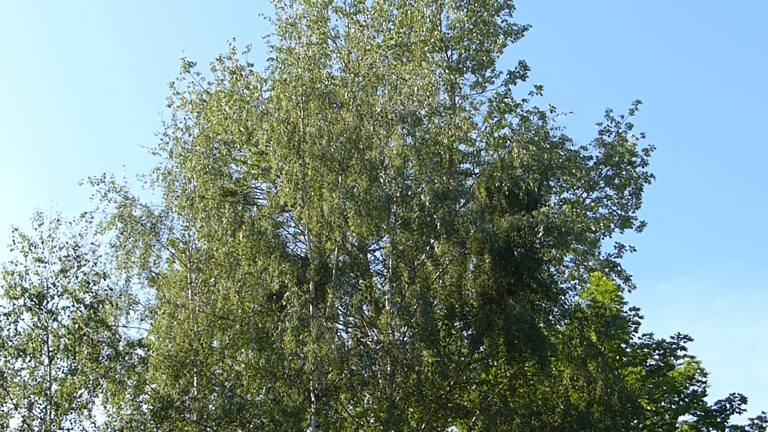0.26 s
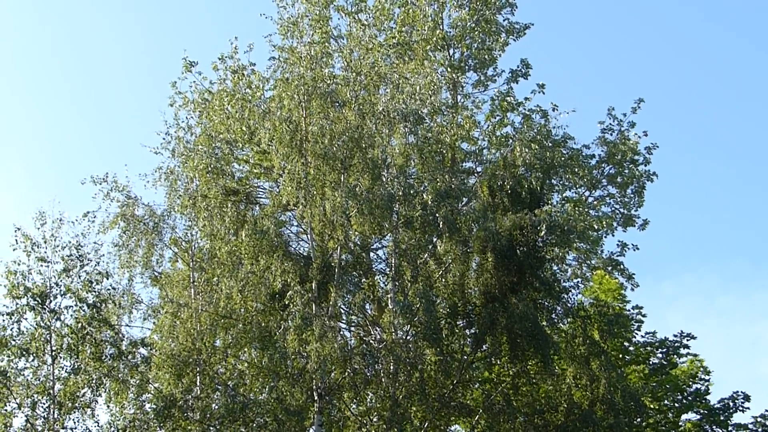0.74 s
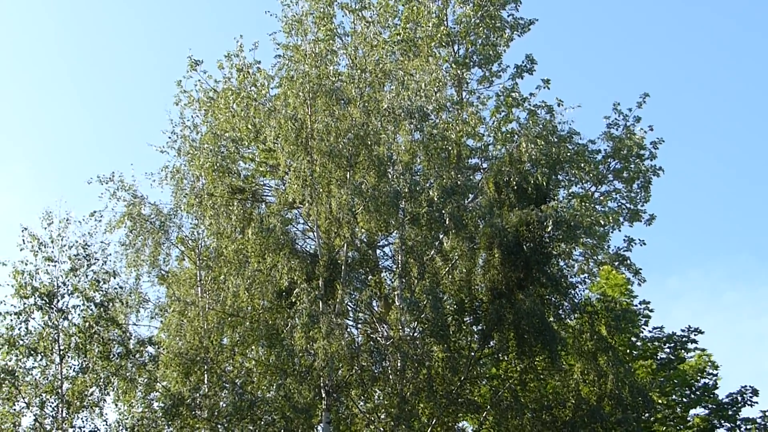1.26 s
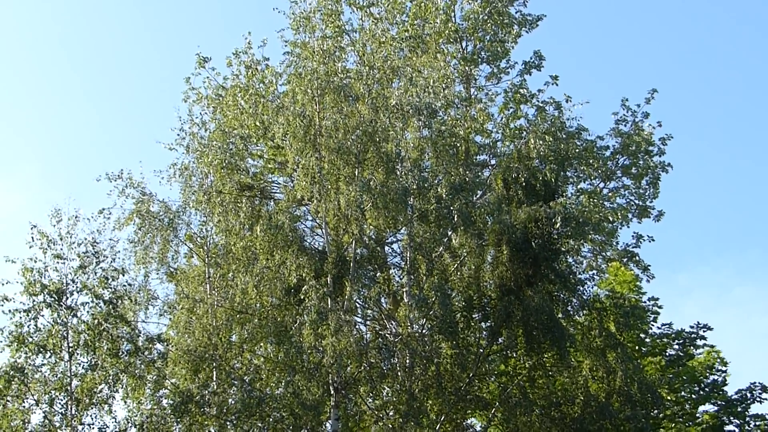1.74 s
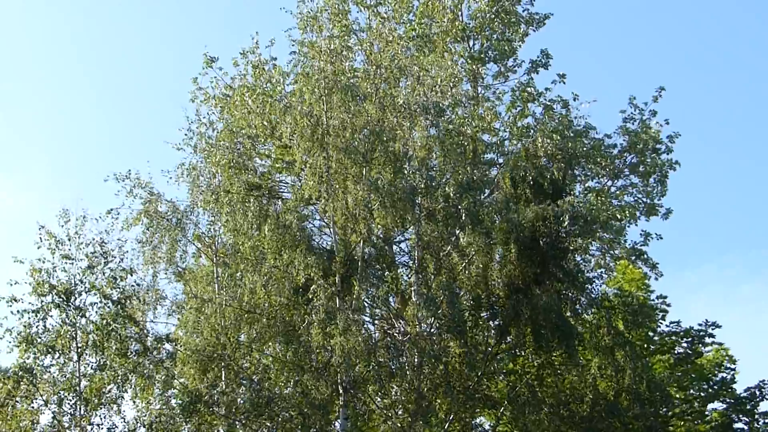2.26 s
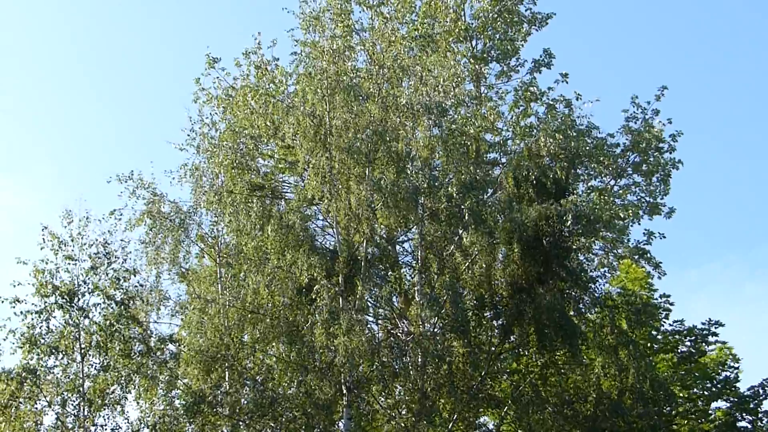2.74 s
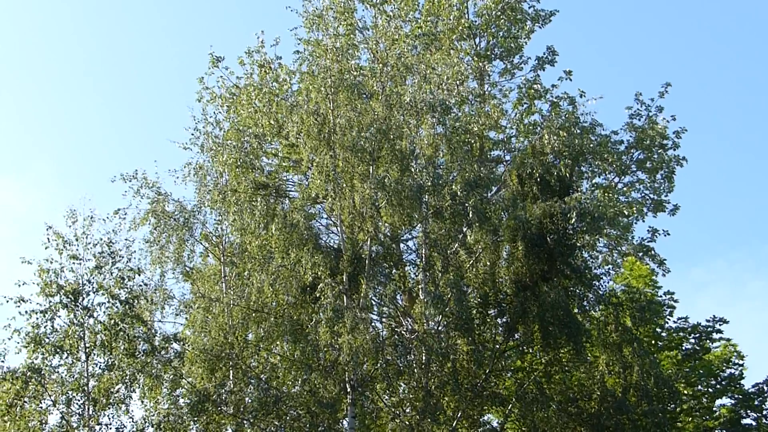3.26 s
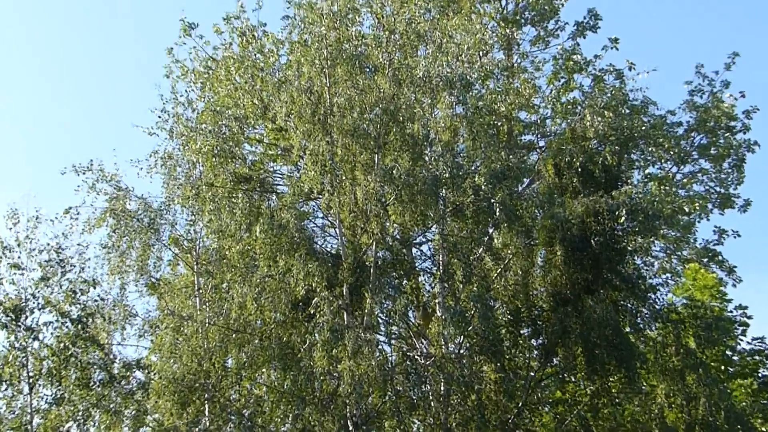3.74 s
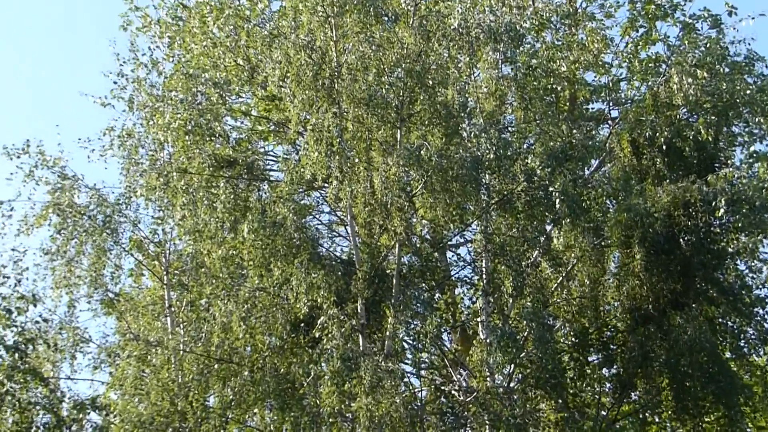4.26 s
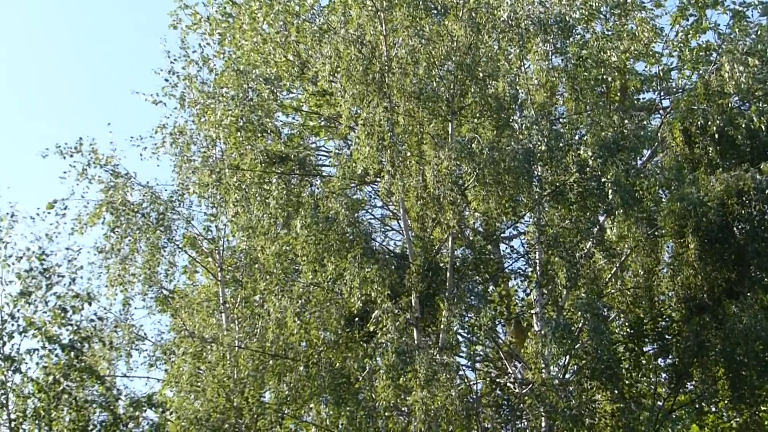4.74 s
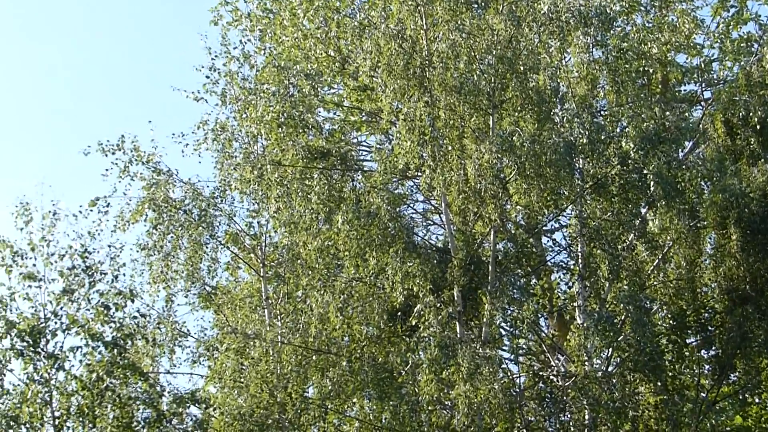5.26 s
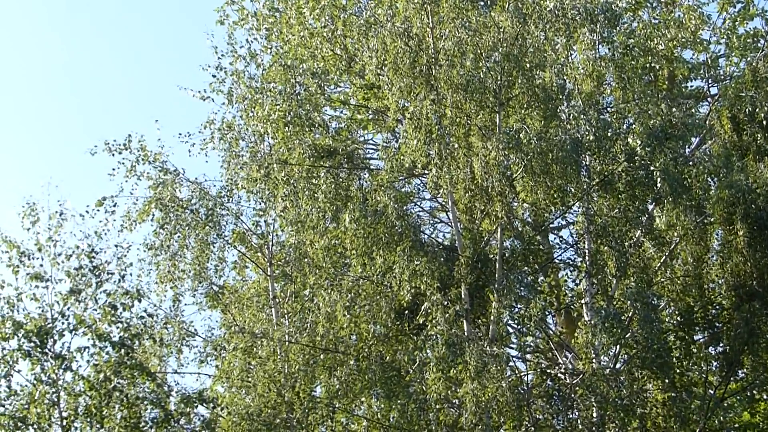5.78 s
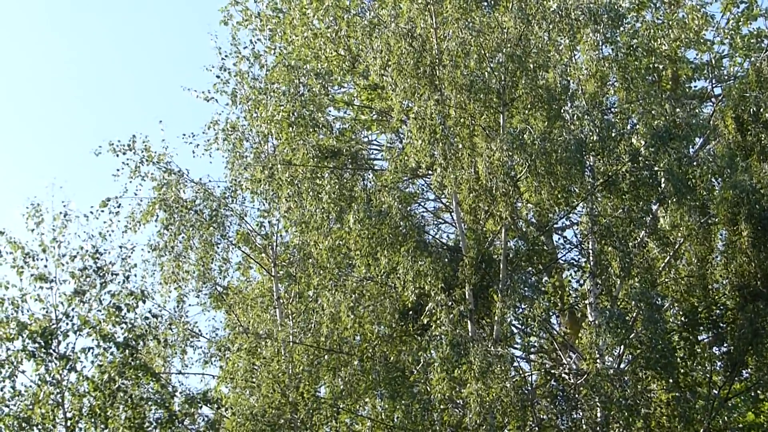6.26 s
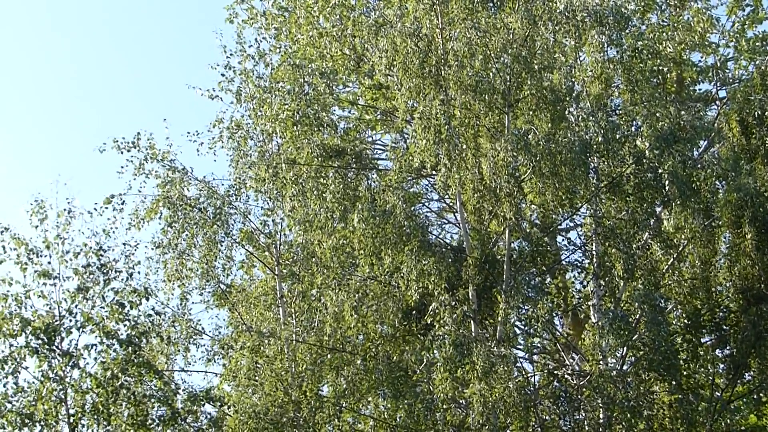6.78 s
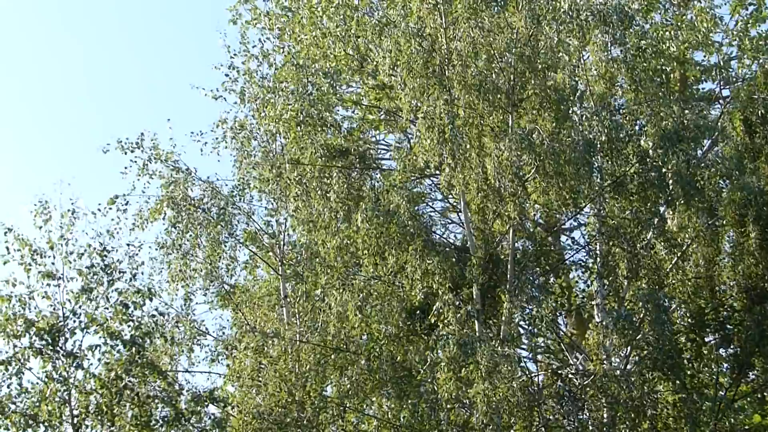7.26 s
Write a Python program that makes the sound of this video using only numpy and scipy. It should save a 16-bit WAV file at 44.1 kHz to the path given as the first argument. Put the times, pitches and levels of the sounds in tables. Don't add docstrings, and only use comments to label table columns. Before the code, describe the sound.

From 0 to 3.3 seconds a small warbler, centred and clearly loudest, sings a rapid, high, sweet phrase. Quick flourishes lead into sharp falling whistles until about 1 second; three hooked drops follow, then a longer, lower fall near 1.35. Between 1.7 and 2.9 come twisting notes and evenly repeated downward slides with little flicks, and a tight four-beat rattle closes the song around 3.0 to 3.3. Weaker birds left and right chip and whistle in between. After that only they remain: soft falling drips from 3.8 to 4.9, scattered chirps and short high blips around 5 to 5.3, tiny whistles and a brief buzz near 6.25, dry chirrs at 6.7 and 7.35. Faint leaf ticks occur near 5.2, 5.5 and 6.4. Soft breeze and distant hum continue to 7.5, and trees give the calls a diffuse outdoor echo.

```python
import sys
import numpy as np
from scipy import signal
from scipy.fft import rfft, irfft
from scipy.io import wavfile
from scipy.ndimage import uniform_filter1d

SR = 44100
rng = np.random.default_rng(int(sys.argv[2]) if len(sys.argv) > 2 else 0)


def generate_wav(signal):
    frames = np.transpose(np.atleast_2d(signal))
    scaled = np.clip(frames, -1, 1) * 32767
    pcm = np.round(scaled).astype(np.int16)
    wavfile.write(sys.argv[1], SR, pcm)


def natural_amplitude(level_db):
    exponent = np.asarray(level_db, float) / 20
    return 10 ** exponent


N = 331191

# frequency in Hz, density in dB per Hz.
AIR_COLOUR = [(18, -14), (30, -15.5), (164, -8.5), (307, -7.5), (369, -4.5), (467, -0.5), (561, -4),
              (897, 0.5), (1050, -3), (2180, -11.5), (4090, -7.5), (9680, -16), (15500, -29)]
# frequency in Hz, likeness from -1 to 1.
AIR_ALIKE = [(30, 0.65), (60, 0.62), (250, -0.21), (700, -0.17), (1500, 0.28), (4000, 0.64), (15000, 0.35)]
# centre in Hz, width in Hz, gain in dB.
HOLLOWS = [
    (232, 43, 8),
    (307, 28.4, 11),
    (474, 54, 6),
    (1050, 44, -6),
]
# time in seconds, level in dB.
BREEZE = [(0, 1.5), (1.5, 1), (1.9, 3), (2.7, 1), (3.3, 2.5), (3.45, -2.5), (3.75, -0.5), (3.95, 2.5),
          (4.3, -0.5), (5.7, 1), (7.5, 0)]
# start in seconds, level in dB.
TICKS = [
    (5.19, -51),
    (5.494, -51.5),
    (6.44, -56),
]

# start in seconds, length in seconds, top pitch in Hz, level in dB.
WIDE_TRILLS = [(0., .1, 5000, -52), (.18, .2, 3900, -55), (2.3, .4, 3900, -56), (3.0, .24, 5200, -54),
               (3.67, .2, 5600, -57), (3.83, .083, 6500, -54.5), (4.461, .16, 5900, -57),
               (4.696, .11, 5300, -53), (4.749, .11, 1850, -58.5), (4.959, .021, 5150, -51),
               (6.014, .12, 5900, -50.5), (6.335, .022, 5100, -46), (6.431, .034, 7400, -57),
               (6.478, .022, 5200, -48), (6.999, .057, 2800, -54)]
# start in seconds, length in seconds, top pitch in Hz, level in dB.
NARROW_TRILLS = [
    (0., 0.035, 6540, -47.5),
    (0., 0.039, 4210, -50),
    (1.36, 0.2, 2843, -51),
    (1.999, .7, 3500, -60),
    (3.566, .22, 7050, -65),
    (6.118, .041, 7470, -58.5),
]
# start in seconds, length in seconds, first and last pitch in Hz, level in dB.
FAINT_GLIDES = [(.673, .012, 3700, 4120, -50.5), (1.082, .01, 5250, 5070, -53),
                (1.085, 0.016, 3800, 3120, -55), (1.099, .04, 3050, 2960, -66),
                (1.42, .03, 3900, 3400, -52), (1.825, 0.017, 4900, 4160, -43.5),
                (1.853, 0.0055, 4700, 4870, -45), (2.155, 0.0073, 3400, 3740, -50),
                (2.268, .012, 2300, 2040, -61), (2.612, 0.014, 3100, 3110, -58),
                (2.62, 0.039, 2250, 2220, -58), (2.86, 0.081, 2680, 2670, -65.5),
                (2.97, 0.027, 2450, 1950, -58), (3.015, 0.2, 2640, 2696, -66.5),
                (3.38, 0.02, 4500, 3700, -53), (3.41, 0.052, 3950, 4050, -59.5),
                (3.475, 0.05, 3100, 3450, -62), (3.6, 0.018, 4500, 4300, -63),
                (3.843, 0.011, 4800, 5060, -58), (4.203, .01, 3700, 4300, -62),
                (4.222, 0.0088, 4000, 3500, -70), (3.768, .014, 5700, 4860, -58),
                (3.843, 0.02, 5800, 6800, -60), (3.878, 0.015, 5700, 6560, -60.5),
                (3.953, .014, 4250, 3700, -54.5), (3.86, 0.23, 1264, 1227, -70),
                (4.145, 0.022, 817, 794, -60), (4.155, 0.041, 2850, 2480, -66),
                (4.2, 0.038, 2420, 2370, -71), (4.465, 0.034, 4300, 3600, -69),
                (4.462, 0.01, 6300, 5580, -59), (4.588, 0.026, 4100, 3700, -65),
                (4.705, 0.081, 4950, 4870, -62.5), (4.72, 0.089, 3350, 3360, -67),
                (4.785, 0.071, 2250, 1700, -62), (5.83, .095, 4450, 3900, -70),
                (6.03, 0.11, 6050, 6900, -67), (1.52, 0.066, 8100, 7650, -67),
                (6.11, 0.091, 5050, 5250, -79), (6.783, .012, 5900, 5700, -67),
                (6.995, .012, 1800, 1740, -51.5), (7.245, 0.022, 2750, 2980, -59)]

SWEEP = [
    (.004, .052, 4310, 3144, 2510, -55),
]
SWEEP_AT = 3.031 + .1203 * np.arange(6)
HUMP = [
    (0., 0.0246, 1470, 1790, 1665, -50),
]
HUMP_AT = [.839, .892, 2.31, 2.35, 2.393, 2.429]
DRIP = [
    (.003, .012, 3460, 2980, 2440, -59),
    (.015, 0.0156, 2440, 2105, 1850, -69.5),
]
DRIP_AT = [3.805, 3.961, 4.107, 4.25, 4.407, 4.55, 4.689, 4.83]
# start in seconds, length in seconds, first and last pitch in Hz, level in dB.
EDGE_GLIDES = [
    (.33, 0.013, 4420, 4300, -53),
    (.342, 0.014, 4300, 2900, -46),
    (.361, 0.016, 2500, 1950, -53.5),
    (2.139, .055, 2500, 1410, -52),
]

# start in seconds, length in seconds, pitch in Hz, level in dB.
RIGHT_HELD = [
    (1.852, 0.08, 2380, -53.5),
    (2.352, 0.03, 2360, -56),
    (2.384, 0.063, 2350, -52.5),
    (6.96, .09, 7750, -73),
    (7.09, 0.065, 7800, -67),
    (6.884, 0.041, 6400, -65),
    (7.315, 0.019, 8200, -60),
    (6.8, 0.14, 4050, -64.5),
]
# start in seconds, length in seconds, first and last pitch in Hz, level in dB.
RIGHT_GLIDES = [(.484, 0.032, 4320, 3650, -53), (2.022, 0.033, 2440, 2193, -56),
                (2.538, 0.017, 2630, 2150, -55), (3.331, 0.033, 4260, 3650, -46.5),
                (3.643, .031, 4640, 3770, -50.5), (3.907, .033, 4550, 3630, -49),
                (6.17, 0.18, 5300, 6150, -66), (6.215, 0.02, 4400, 3960, -56),
                (6.232, 0.14, 3870, 4115, -53.5), (4.357, .016, 5900, 5200, -62),
                (4.6, 0.016, 6560, 6050, -58), (5.955, 0.062, 4000, 4580, -68),
                (6.156, 0.032, 3290, 2030, -57), (7.27, 0.075, 7300, 6900, -68),
                (6.348, 0.023, 5620, 4480, -56), (6.99, 0.115, 5320, 5900, -63.5),
                (7.01, 0.15, 3610, 4080, -61)]
DOUBLE = [
    (0., 0.013, 3490, 3430, 3340, -53),
    (.021, 0.011, 3550, 3540, 3470, -58),
]
DOUBLE_AT = 2.743 + .0655 * np.arange(4)

# start in seconds, length in seconds, pitch in Hz, level in dB.
LEFT_HELD = [(0., 0.018, 4000, -48), (.223, 0.03, 2836, -53.5), (.253, .028, 2810, -47.5),
             (.512, 0.03, 2567, -55), (6.5, .04, 3250, -58), (.197, .024, 3366, -49.5),
             (5.154, 0.029, 4100, -47), (5.278, .015, 4720, -50.5), (6.592, 0.046, 2840, -54.5),
             (6.649, 0.047, 2830, -55), (6.714, 0.069, 2830, -60), (6.886, 0.16, 2540, -61.5),
             (0., 0.024, 6360, -53)]
# start in seconds, length in seconds, first and last Hz, level in dB.
LEFT_EARLY = [(.156, .014, 2690, 3650, -54), (.412, 0.028, 1917, 2525, -50.5),
              (1.311, 0.0373, 3670, 3000, -49), (1.562, 0.062, 3130, 3640, -46.5),
              (1.115, 0.023, 3420, 3640, -47), (2.653, 0.0394, 2380, 2630, -51.5),
              (5.8, .012, 4510, 4440, -62), (4.877, 0.022, 2090, 2200, -59.5),
              (5.096, 0.063, 2900, 4054, -48.5), (5.258, 0.02, 6500, 5160, -51),
              (5.285, 0.0243, 3450, 4200, -52.5), (6.6, 0.021, 6500, 4400, -74),
              (5.525, 0.027, 2050, 2950, -57.5), (5.623, .044, 3337, 2780, -57),
              (5.667, 0.0298, 2900, 2380, -55), (5.736, 0.017, 2230, 2130, -54),
              (5.815, 0.027, 2040, 1820, -56), (6.7, .01, 1800, 1620, -73),
              (6.488, 0.013, 4200, 3560, -49.5), (6.864, 0.0221, 1750, 2490, -56),
              (7.175, 0.0265, 5640, 4770, -58)]
# start in seconds, length in seconds, first and last Hz, level in dB.
LEFT_LATE = [(.446, .06, 2620, 2240, -54), (2.777, 0.053, 2600, 2236, -52), (5.952, 0.032, 1620, 1320, -60),
             (4.33, 0.029, 3910, 3370, -53), (4.375, 0.021, 3770, 3090, -54.5),
             (1.86, 0.05, 3950, 3280, -44), (3.687, 0.028, 5180, 4570, -54.5),
             (3.884, 0.028, 3950, 3310, -53.5), (4.797, 0.035, 1400, 1580, -54),
             (4.97, 0.026, 4130, 3800, -56), (7.491, .017, 2850, 3280, -60)]
# start in seconds, length in seconds, edge pitch and turning pitch in Hz, level in dB.
LEFT_TURNS = [(6.074, 0.034, 1495, 1652, -55), (1.219, 0.05, 2310, 2690, -57),
              (1.98, 0.033, 2650, 2194, -55.5), (4.539, 0.055, 2460, 1940, -62),
              (5.708, 0.017, 2570, 2285, -54), (5.773, 0.032, 2130, 1918, -53),
              (6.541, 0.039, 3320, 3490, -50.5), (7.11, 0.0233, 3840, 4150, -50.5),
              (7.126, 0.013, 3950, 3535, -47), (7.142, 0.017, 3710, 4420, -48.5),
              (7.267, .023, 2630, 3306, -55)]
# start in seconds, length in seconds, first and last pitch in Hz, level in dB.
CHIPS = [(.072, 0.009, 2030, 2600, -58), (.084, 0.0086, 2480, 1870, -53.5), (2.832, 0.018, 2236, 1800, -58),
         (5.049, 0.029, 5250, 3360, -52), (5.249, 0.0083, 4500, 6530, -56),
         (5.502, 0.013, 2570, 1920, -59.5), (5.782, 0.016, 5900, 4580, -64),
         (5.927, 0.009, 4000, 2400, -66), (6.055, .009, 2980, 1700, -65), (6.338, .012, 4680, 4550, -56),
         (6.478, 0.013, 4470, 4880, -52), (6.848, 0.0086, 1970, 2400, -69)]
# start in seconds, length in seconds, first and last pitch in Hz, level in dB.
BUZZES = [
    (0.694, 0.061, 2220, 1730, -52),
    (5.304, 0.021, 4320, 4290, -53.5),
    (6.25, 0.0513, 2092, 2405, -53.5),
]
PIP = [
    (0., 0.0152, 2690, 2422, 2258, -51),
]
PIP_AT = .594 + 0.032 * np.arange(4)
SCOOP = [
    (0., 0.0256, 1880, 2590, 2640, -62.5),
]
SCOOP_AT = [5.376, 5.426]
CHIRR = [
    (0., .016, 4900, 4740, 4290, -51.5),
    (.018, 0.0096, 4480, 3830, 4400, -47),
    (.034, .008, 4810, 4690, 4400, -55),
    (.044, 0.013, 4300, 3900, 4030, -48),
]
CHIRR_AT = [6.712, 7.344]

OPENING = [
    (-.092, 0.0075, 5000, 5440, 6200, -48.5),
    (-.078, .012, 8400, 9300, 9700, -60),
    (-.077, .014, 4500, 4800, 5200, -47.5),
    (-.063, 0.0057, 5200, 6000, 7000, -47),
    (-.051, .016, 8600, 7600, 7500, -53),
    (-.027, .008, 7700, 6900, 6450, -44.5),
    (-.019, .018, 6450, 6750, 6400, -48.5),
]
OPENING_AT = [.258, .489, .805]
LEAD_IN = [
    (-.03, 0.0175, 7920, 7360, 7200, -53),
    (-.011, 0.015, 8480, 7600, 6540, -48),
]
LEAD_IN_AT = [1.354]
HOOK = [
    (-.034, 0.016, 6290, 5740, 5830, -46.5),
    (-.012, .006, 8800, 9270, 9000, -58),
    (-.006, 0.0043, 9000, 7400, 6840, -47),
    (-.001, .009, 6350, 5520, 5100, -35.5),
    (.008, .034, 5326, 4440, 3850, -38),
]
HOOK_AT = 1.018 + .113 * np.arange(3)
TWIST = [
    (-.033, 0.0065, 7230, 5640, 4950, -47),
    (-.025, .007, 4940, 6620, 8300, -47),
    (-.018, 0.005, 8300, 8750, 8000, -51),
    (-.012, 0.0065, 6410, 5430, 4650, -38),
    (-.006, .01, 4670, 5150, 5330, -34),
    (.004, 0.0168, 5340, 4670, 4070, -39),
    (.021, 0.0142, 4100, 4420, 5000, -40),
]
TWIST_AT = [1.702, 1.961]
VEE = [
    (-.044, .008, 7670, 6410, 5030, -48),
    (-.036, 0.022, 5080, 6000, 6840, -41.5),
    (-.014, .01, 3950, 4500, 4900, -50),
]
UPSTROKE = [
    (-.029, 0.0102, 5700, 6150, 6750, -41.5),
]
SLIDE = [
    (-.004, .009, 4905, 5220, 5200, -43),
    (.005, .017, 5480, 5000, 4510, -38),
    (.022, .027, 4476, 4134, 3690, -41),
]
SLIDE_AT = [1.769, 2.028, 2.229, 2.422, 2.613, 2.808]
SLIDE_TAIL = [
    (.057, .006, 4400, 4750, 4830, -46),
    (.063, 0.013, 4850, 4520, 3900, -42),
    (.081, .006, 4350, 4700, 4850, -39.5),
    (.087, 0.0089, 4885, 4935, 4980, -39.5),
]
RATTLE = [
    (-.009, 0.01, 7170, 6200, 5500, -44),
    (.001, .007, 5480, 5470, 5740, -40.5),
    (.008, 0.012, 5700, 6300, 6900, -41),
]
RATTLE_AT = 3.019 + .071 * np.arange(4)
RATTLE_GRACE = [
    (-.014, .006, 8500, 7900, 7200, -48),
]
# start in seconds, length in seconds, last pitch in Hz, level in dB.
FALLS = [
    (0.26, 0.059, 4660, -35),
    (0.488, 0.059, 4710, -33.5),
    (0.611, 0.055, 4685, -33.5),
    (0.807, 0.054, 4625, -34),
    (.903, .039, 4600, -35),
    (1.358, 0.088, 3765, -34.5),
]
# start in seconds, length in seconds, first and last pitch in Hz, level in dB.
SONG_GLIDES = [(1.556, 0.015, 5010, 4100, -39.5), (1.592, 0.0067, 6900, 5430, -43),
               (1.6, 0.012, 5330, 6050, -36), (2.329, .024, 3260, 4380, -45),
               (2.972, 0.0065, 8520, 6450, -43.5), (2.979, 0.011, 6200, 6220, -46),
               (3., 0.0089, 6240, 6100, -47), (1.57, 0.0063, 4150, 4150, -39),
               (1.762, 0.0051, 6740, 5330, -44), (2.022, 0.0082, 6190, 5020, -43),
               (2.277, 0.0089, 3690, 3300, -56), (3.268, .005, 4190, 4940, -39),
               (3.273, 0.021, 5110, 4360, -39), (3.293, 0.02, 4250, 3690, -40.5)]
# start in seconds, length in seconds, edge pitch and turning pitch in Hz, level in dB.
SONG_TURNS = [
    (.598, .015, 6400, 6950, -46),
    (1.525, 0.013, 5180, 6580, -47),
    (1.54, 0.016, 4970, 5340, -39),
    (2.956, .0097, 7500, 8250, -52),
]

EARLY_REACH, EVEN_REACH, LATE_REACH = .75, .55, .26
OPEN_TWIGS_DB, LEAFY_TWIGS_DB = -12, -5


def walk(rate):
    hold = int(SR / rate)
    steps = np.repeat(rng.standard_normal(N // hold + 1), hold)
    return 1.4 * uniform_filter1d(steps, hold)[:N]


def air(level_db=-52.5, flicker_db=1.18):
    hz = np.fft.rfftfreq(N, 1 / SR) + 1
    colour_hz, colour_db = np.transpose(AIR_COLOUR)
    db = np.interp(np.log(hz), np.log(colour_hz), colour_db)
    for centre_hz, width_hz, gain_db in HOLLOWS:
        db = db + gain_db / (1 + ((hz - centre_hz) / width_hz * 2) ** 2)
    alike_hz, likeness = np.transpose(AIR_ALIKE)
    alike = np.clip(np.interp(np.log(hz), np.log(alike_hz), likeness), -.9, .9)
    mid, side = rfft(rng.standard_normal((2, N))) * natural_amplitude(db) * np.sqrt([1 + alike, 1 - alike])
    ports = np.array([mid + side, mid - side])
    swell_db = np.interp(np.arange(N) / SR, *np.transpose(BREEZE))
    out = 0
    for octave in range(5, 15):
        band = np.cos(np.pi / 2 * np.clip(np.log2(hz) - octave, -1, 1)) ** 2
        gain_db = swell_db * (octave > 7) + flicker_db * walk(10)
        out = out + irfft(ports * band, N) * natural_amplitude(gain_db)
    return out * natural_amplitude(level_db + np.array([[.4], [-.4]])) / out.std()


def ticks():
    out, t = np.zeros(N), np.arange(SR // 20) / SR
    for start, db in TICKS:
        envelope = natural_amplitude(db - 60 * t / .078) * np.clip(t / .0031, 0, 1)
        out[int(start * SR):][:len(t)] += envelope * rng.standard_normal(len(t))
    bright = signal.butter(1, (5000, 10000), "band", fs=SR, output="sos")
    return signal.sosfilt(bright, out)


def swaying(x, echoes):
    turn = 1.6 * walk(6)
    first = signal.fftconvolve(x * np.cos(turn), echoes[0])[:N]
    second = signal.fftconvolve(x * np.sin(turn), echoes[1])[:N]
    return first + second


def twigs(x, share_db, t60_s=.05):
    t = np.arange(int(t60_s * SR)) / SR
    echoes = rng.standard_normal((2, len(t))) * natural_amplitude(-60 * t / t60_s)
    return x + swaying(x, echoes * natural_amplitude(share_db) / np.sqrt(np.sum(echoes[0] ** 2)))


def wood(x, late_db, late_t60, alike, beyond_db, depth_s=.093, leaf_hz=2400, onset_s=.0069):
    trunks_per_s, trunk_share, clump_db = 350, .15, 1.5
    t = np.arange(int(1.2 * SR)) / SR
    tail = natural_amplitude(late_db - 60 * t / late_t60) * np.clip(t / onset_s, 0, 1) / np.sqrt(late_t60)
    tail = tail * natural_amplitude(beyond_db * np.clip((t - depth_s) / .0072, 0, 1))
    tail = tail * natural_amplitude(clump_db * walk(198.6)[:len(t)]) / np.sqrt(SR / 14)
    trunk = rng.random(len(t)) < trunks_per_s / SR
    tail = tail * np.sqrt(1 - trunk_share + trunk_share * trunk * SR / trunks_per_s)
    leaves = signal.butter(2, leaf_hz, "high", fs=SR, output="sos")
    mid, side = signal.sosfilt(leaves, rng.standard_normal((2, 2, len(t))) * tail)
    side = side * np.sqrt((1 - min(alike, .99)) / (1 + alike))
    mid, side = swaying(x, mid), swaying(x, side)
    return np.array([mid + side, mid - side])


def place(x, pan_db, lag_us, twigs_db=LEAFY_TWIGS_DB):
    hz = np.fft.rfftfreq(N, 1 / SR)
    x = twigs(x, twigs_db)
    late = irfft(rfft(x) * np.exp(-2j * np.pi * hz * lag_us * 1e-6), N)
    return np.array([late * natural_amplitude(pan_db / 2), x * natural_amplitude(-pan_db / 2)])


def stroke_shape(n, edge_s=.0023):
    t = np.arange(n) / SR
    return np.sin(np.pi / 2 * np.clip(np.minimum(t, t[::-1]) / edge_s, 0, 1)) ** 2


def repeat(figure, times, growth_db=0.):
    return [(start + r[0], *r[1:5], r[5] + k * growth_db)
            for k, start in enumerate(times) for r in figure]


def glides(rows, reach):
    return [(s, d, a, a + reach * (c - a), c, db) for s, d, a, c, db in rows]


def turns(rows):
    return [(s, d, edge, turn, edge, db) for s, d, edge, turn, db in rows]


def held(rows):
    return [(s, d, hz, hz, hz, db) for s, d, hz, db in rows]


def in_time(strokes):
    return sorted(strokes, key=lambda r: r[0])


def slurred(strokes):
    notes = []
    for r in strokes:
        last = notes[-1][-1] if notes else None
        if last and abs(last[0] + last[1] - r[0]) < .0035 and abs(last[4] / r[2] - 1) < .08:
            notes[-1].append(r)
        else:
            notes.append([r])
    return notes


def whistle(strokes, arch_db, flutter_db, low_db=0.):
    out = np.zeros(N + SR)
    flutter = natural_amplitude(flutter_db * walk(150))
    lead = int(.002 * SR)
    for note in slurred(strokes):
        pitches, levels = [], []
        for _, length, a, b, c, level_db in note:
            u = np.linspace(-1, 1, max(int(length * SR), 9))
            pitches.append(b + (c - a) / 2 * u + ((a + c) / 2 - b) * u * u)
            levels.append(level_db + 0 * u)
        hz, db = np.concatenate(pitches), np.concatenate(levels)
        hz, db = (uniform_filter1d(np.pad(v, lead, "edge"), lead) for v in (hz, db))
        db = db + arch_db * (.5 - np.linspace(-1, 1, len(db)) ** 2)
        db = db - 1.7 * np.clip(hz / 1000 - 6.1, 0, None)
        db = db - low_db * np.clip(4.4 - hz / 1000, 0, None)
        tone = np.sin(2 * np.pi * np.cumsum(hz) / SR)
        i = max(int(note[0][0] * SR) - lead, 0)
        out[i:i + len(hz)] += np.sqrt(2) * natural_amplitude(db) * stroke_shape(len(hz)) * tone
    return out[:N] * flutter


def far_trills():
    out, wobble = np.zeros(N + SR), np.pad(walk(60), (0, SR))
    rows = [(*r, .63) for r in WIDE_TRILLS] + [(*r, .87) for r in NARROW_TRILLS]
    for start, length, top_hz, db, share in rows:
        rate = max(top_hz / 155, 1.2 / length)
        i, n = int(start * SR), int(length * SR)
        cycle = (np.arange(n) / SR * rate) % 1
        hz = top_hz * (1 + (share - 1) * cycle ** .91) * (1 + .033 * wobble[i:i + n])
        out[i:i + n] += natural_amplitude(db) * np.sin(np.pi * cycle) ** .5 * np.sin(2 * np.pi * np.cumsum(hz) / SR)
    return out[:N]


def faint_birds():
    return whistle(in_time(glides(FAINT_GLIDES, EVEN_REACH)), arch_db=-1.5, flutter_db=4.5)


def edge_bird():
    strokes = (repeat(SWEEP, SWEEP_AT, growth_db=-1.5) + repeat(HUMP, HUMP_AT, growth_db=-1.0)
               + repeat(DRIP, DRIP_AT, growth_db=1.0) + glides(EDGE_GLIDES, .65))
    return whistle(in_time(strokes), arch_db=2.5, flutter_db=1.05)


def right_birds():
    strokes = held(RIGHT_HELD) + glides(RIGHT_GLIDES, EVEN_REACH) + repeat(DOUBLE, DOUBLE_AT)
    return whistle(in_time(strokes), arch_db=4.5, flutter_db=-.5)


def buzzes():
    dip_s, depth, chain = 1 / 88, .16, []
    for start, length, first_hz, last_hz, db in BUZZES:
        for t in np.arange(0, length, dip_s):
            hz = first_hz + (last_hz - first_hz) * t / length
            chain.append((start + t, dip_s, hz, hz * (1 - depth), db))
    return turns(chain)


def left_birds():
    strokes = (held(LEFT_HELD) + glides(LEFT_EARLY, EARLY_REACH) + glides(LEFT_LATE, LATE_REACH)
               + turns(LEFT_TURNS) + glides(CHIPS, EVEN_REACH) + repeat(PIP, PIP_AT)
               + repeat(SCOOP, SCOOP_AT) + repeat(CHIRR, CHIRR_AT, growth_db=2.0))
    return whistle(in_time(strokes) + buzzes(), arch_db=4.5, flutter_db=1.7)


def long_falls():
    top_hz, knee_reach, knee_share, lead_db = 6480, .52, .47, -3.5
    flick_s, flick_hz, flick_db = .0065, 704, -3
    out = []
    for start, length, last_hz, db in FALLS:
        knee_hz = top_hz + knee_reach * (last_hz - top_hz)
        knee_s = knee_share * length
        out += glides([(start, knee_s, top_hz, knee_hz, db + lead_db)], .83)
        out += glides([(start + knee_s, length - knee_s, knee_hz, last_hz, db)], .62)
        if last_hz > 4000:
            flick = (start + length, flick_s, last_hz, last_hz + flick_hz, db + flick_db)
            out += glides([flick], LATE_REACH)
    return out


def warbler_song():
    strokes = (long_falls() + glides(SONG_GLIDES, EVEN_REACH) + turns(SONG_TURNS)
               + repeat(OPENING, OPENING_AT, growth_db=1.6) + repeat(HOOK, HOOK_AT)
               + repeat(LEAD_IN, LEAD_IN_AT) + repeat(TWIST, TWIST_AT)
               + repeat(SLIDE, SLIDE_AT) + repeat(SLIDE_TAIL, SLIDE_AT[1:])
               + repeat(VEE, SLIDE_AT[2:]) + repeat(UPSTROKE, SLIDE_AT[:2])
               + repeat(RATTLE, RATTLE_AT) + repeat(RATTLE_GRACE, RATTLE_AT[::2]))
    return whistle(in_time(strokes), arch_db=6.0, flutter_db=.65, low_db=3.0)


def scene():
    far, faint, edge = far_trills(), faint_birds(), edge_bird()
    right, left, warbler = right_birds(), left_birds(), warbler_song()
    direct = place(far * natural_amplitude(-7) + ticks(), 16.7, 3.)
    direct += place(faint, 3.8, 4.4)
    direct += place(edge, 5.3, 17.0, OPEN_TWIGS_DB)
    direct += place(right, -6.5, 5.)
    direct += place(left, 7.1, 22.6)
    direct += place(warbler * natural_amplitude(1.28), 1.0, 4.9, OPEN_TWIGS_DB)
    far_wood = wood(right + faint * natural_amplitude(2.0) + far * natural_amplitude(6.0), 0.0, .41, .72, 3.6)
    left_wood = wood(left + edge * natural_amplitude(-9), -.36, .69, .79, 0., leaf_hz=1620)
    left_wood = left_wood * natural_amplitude(np.array([[1.5], [-1.5]]))
    near_wood = wood(warbler, -.92, .56, .78, -.36, leaf_hz=4000, onset_s=.0095)
    return air() + far_wood + left_wood + near_wood + direct


def roll_off(x):
    return signal.sosfilt(signal.butter(12, 15650, fs=SR, output="sos"), x)


def record(dry):
    return roll_off(dry)


dry = scene()
out = record(dry)
generate_wav(out)
```